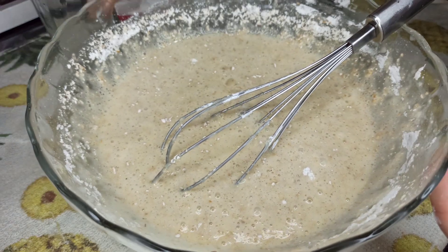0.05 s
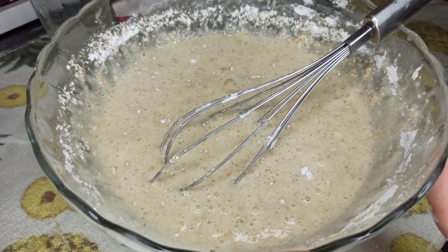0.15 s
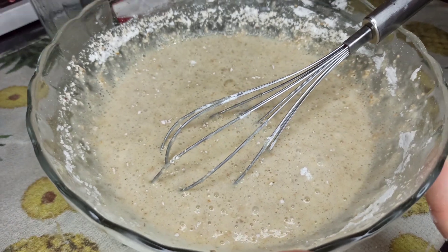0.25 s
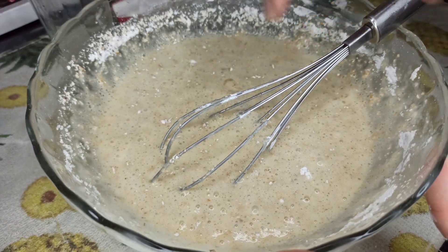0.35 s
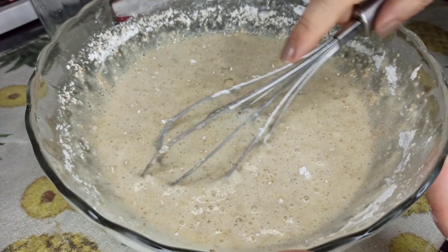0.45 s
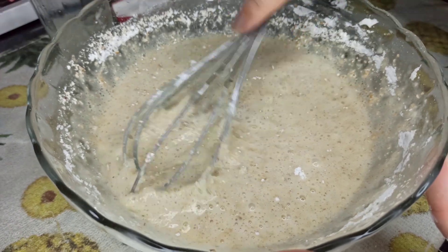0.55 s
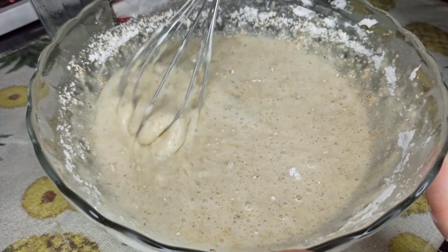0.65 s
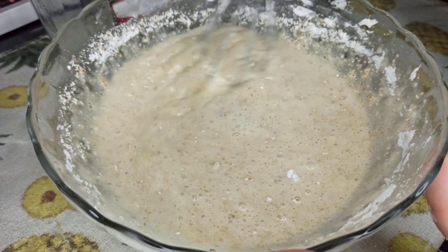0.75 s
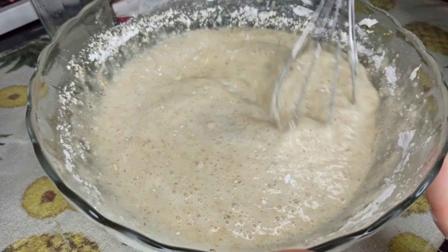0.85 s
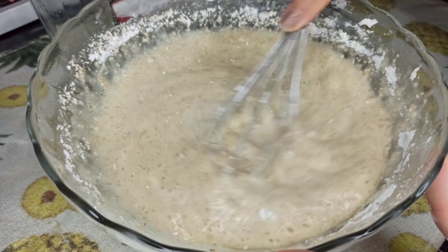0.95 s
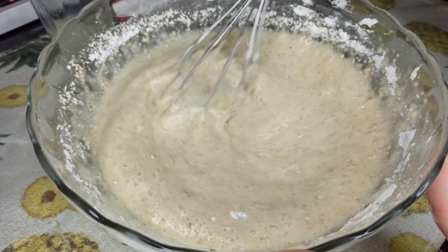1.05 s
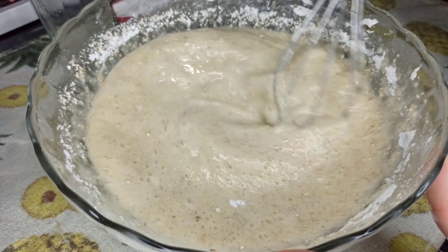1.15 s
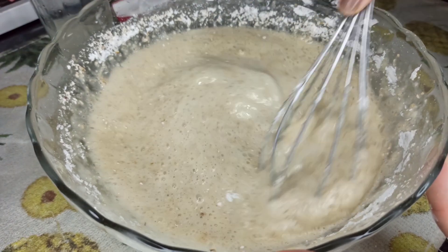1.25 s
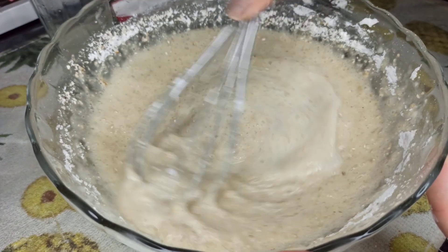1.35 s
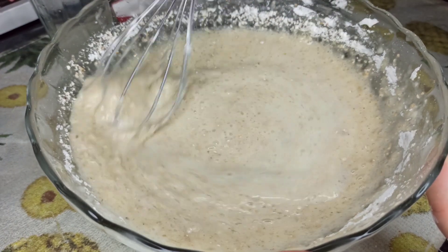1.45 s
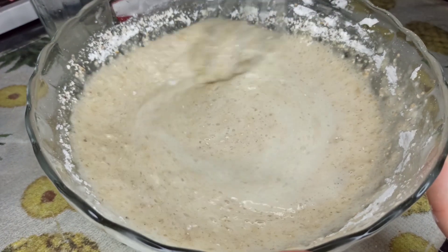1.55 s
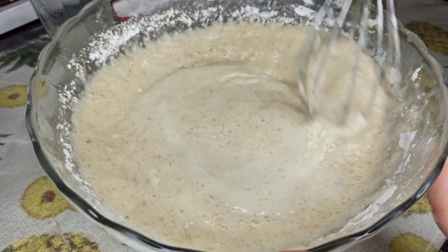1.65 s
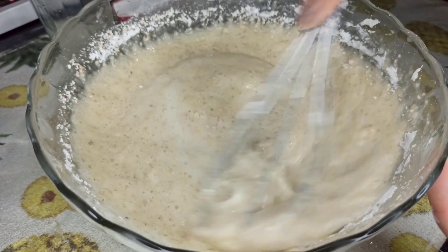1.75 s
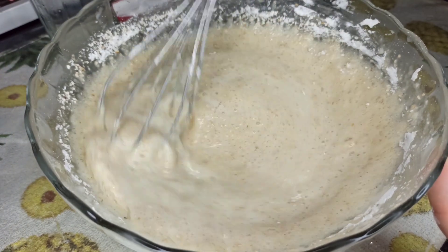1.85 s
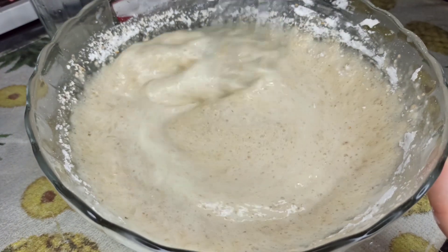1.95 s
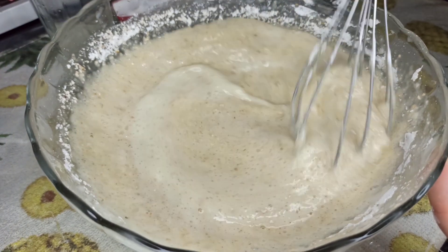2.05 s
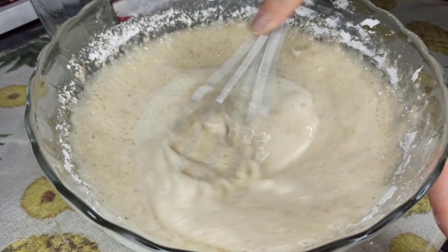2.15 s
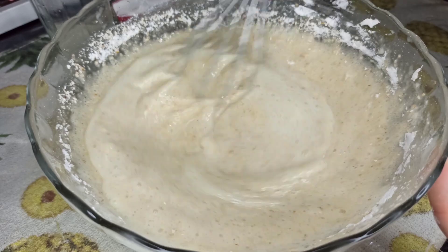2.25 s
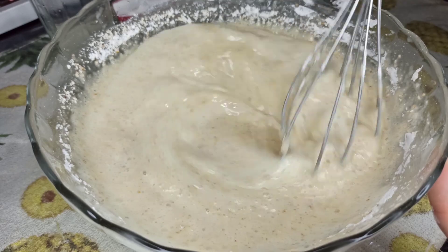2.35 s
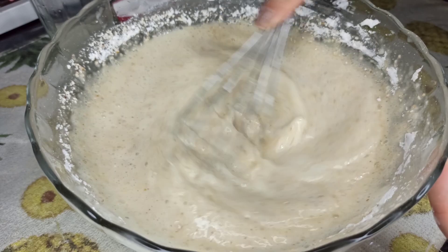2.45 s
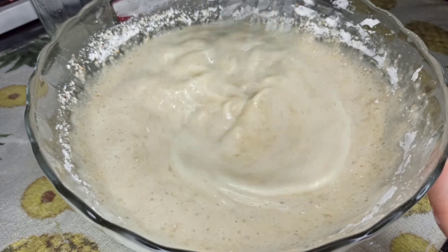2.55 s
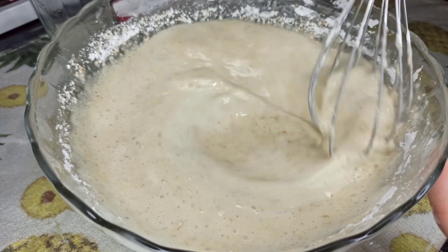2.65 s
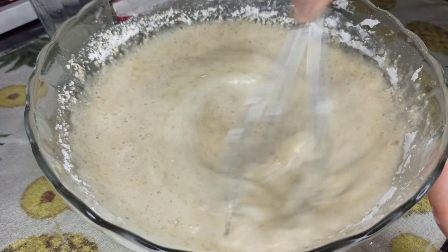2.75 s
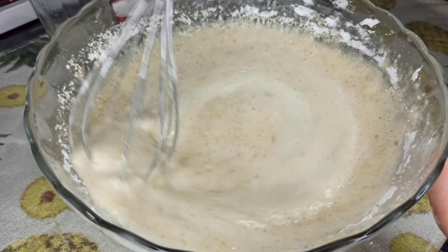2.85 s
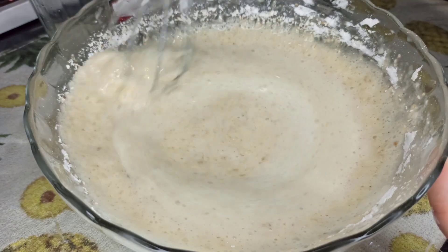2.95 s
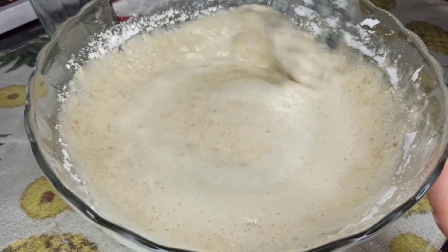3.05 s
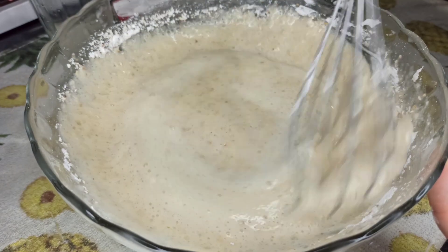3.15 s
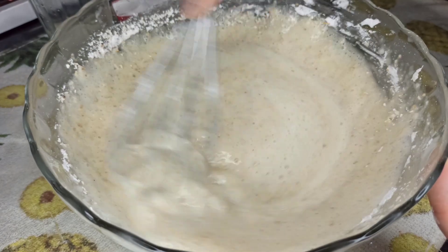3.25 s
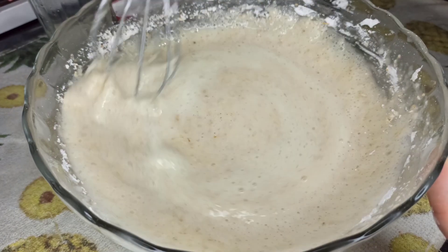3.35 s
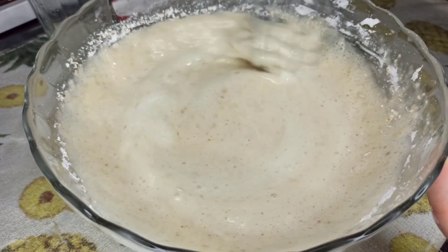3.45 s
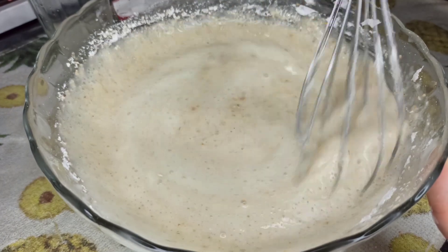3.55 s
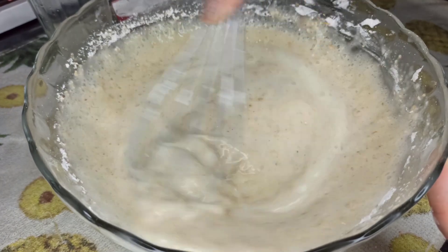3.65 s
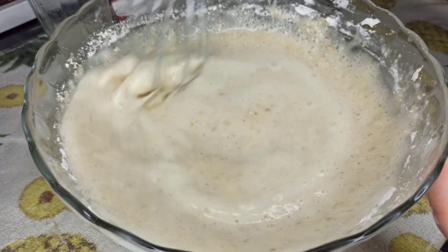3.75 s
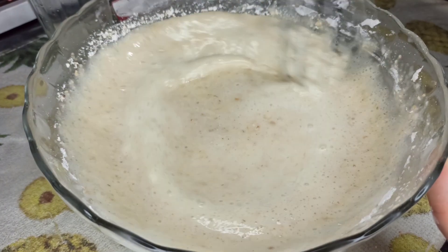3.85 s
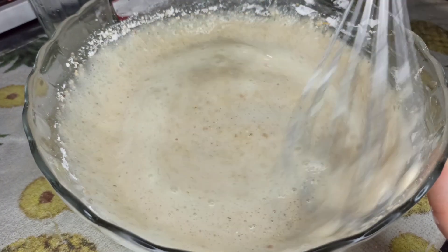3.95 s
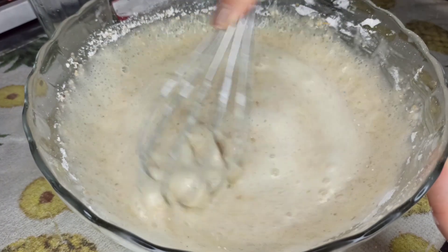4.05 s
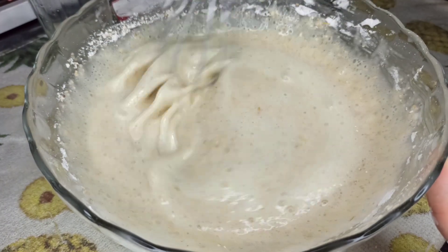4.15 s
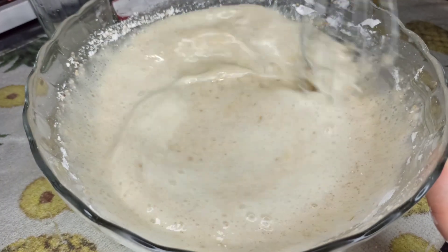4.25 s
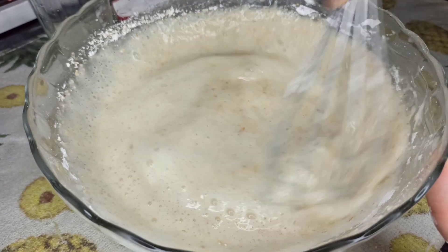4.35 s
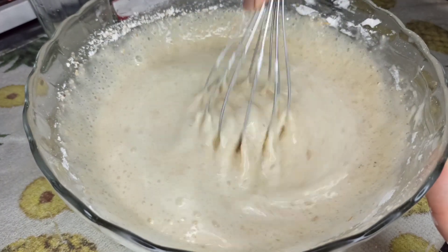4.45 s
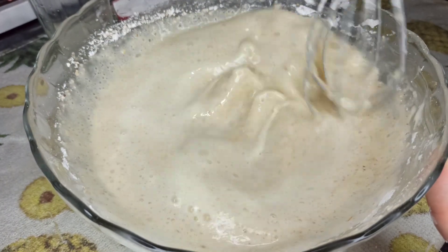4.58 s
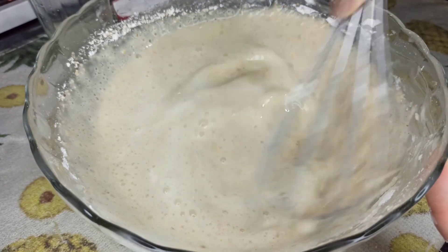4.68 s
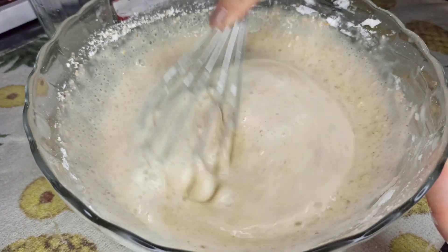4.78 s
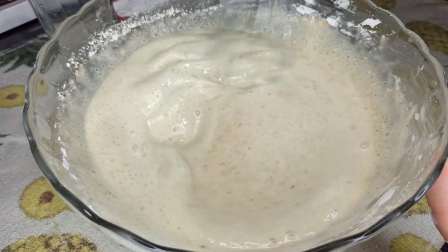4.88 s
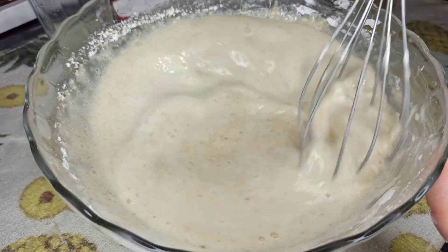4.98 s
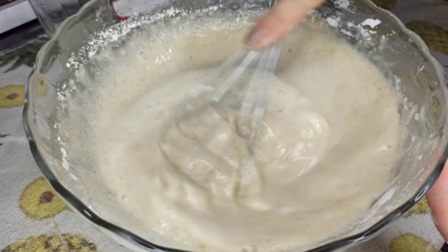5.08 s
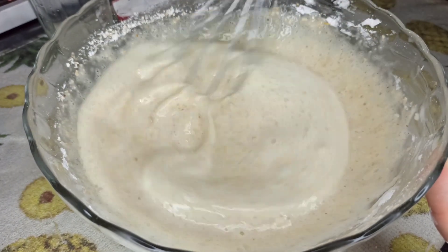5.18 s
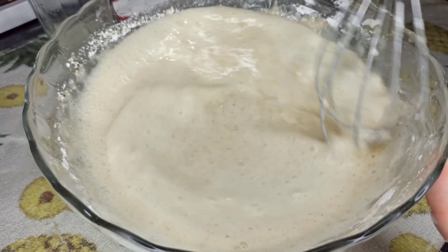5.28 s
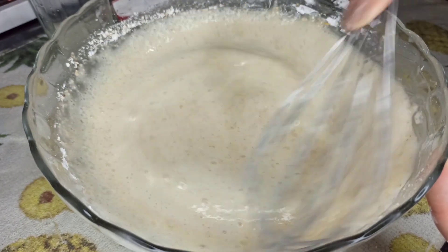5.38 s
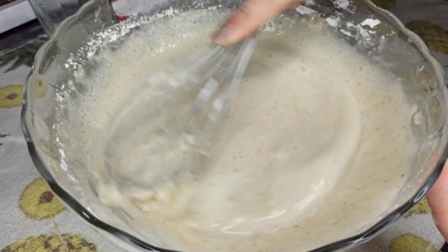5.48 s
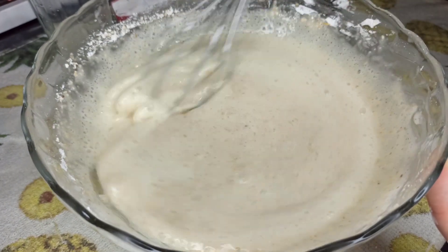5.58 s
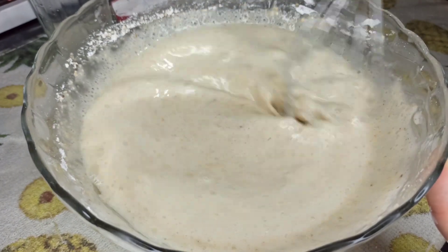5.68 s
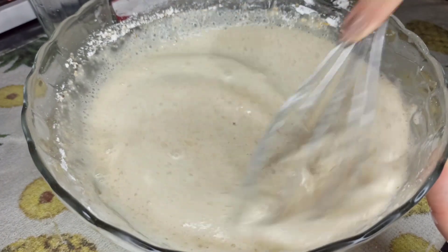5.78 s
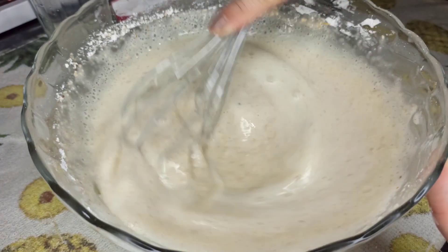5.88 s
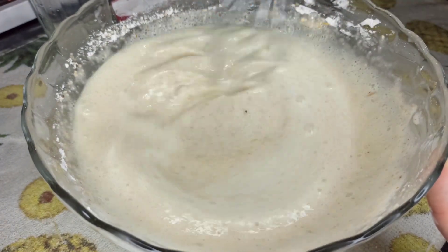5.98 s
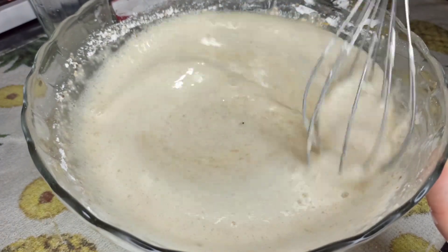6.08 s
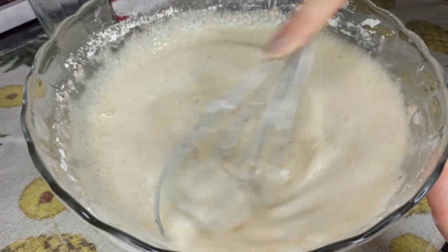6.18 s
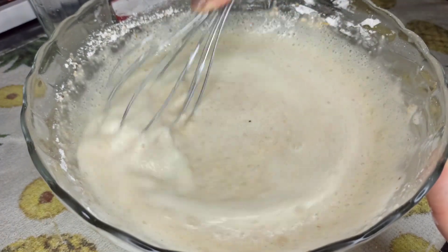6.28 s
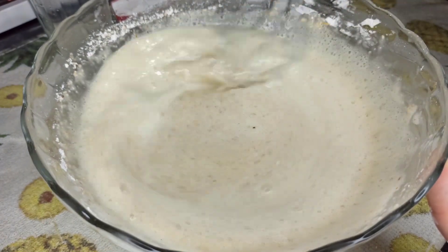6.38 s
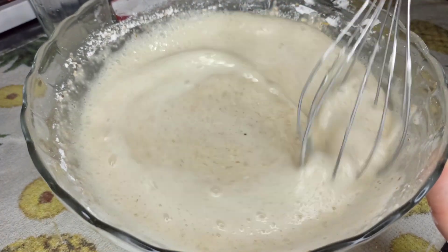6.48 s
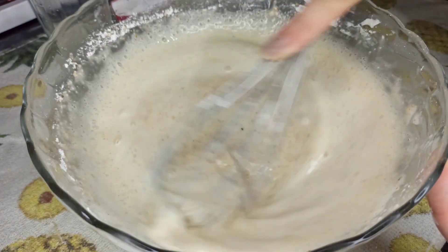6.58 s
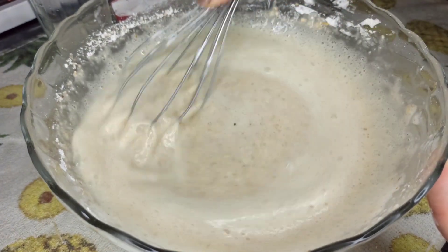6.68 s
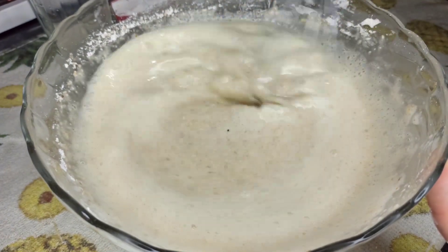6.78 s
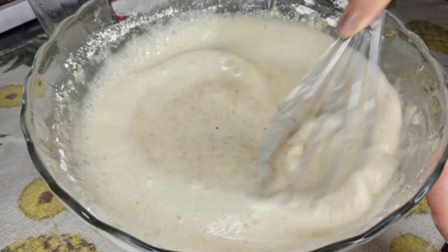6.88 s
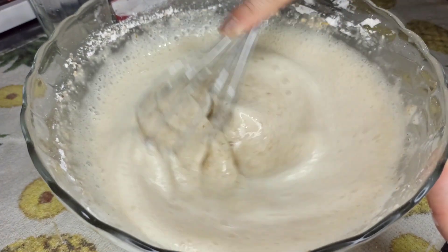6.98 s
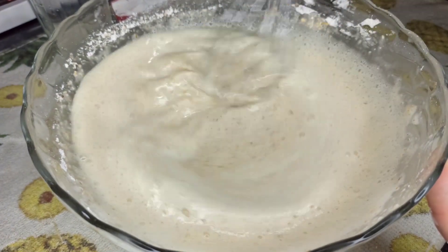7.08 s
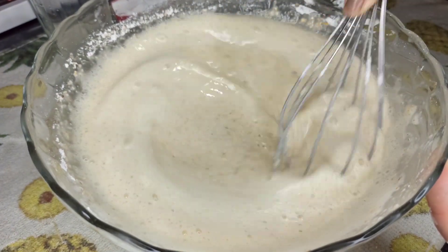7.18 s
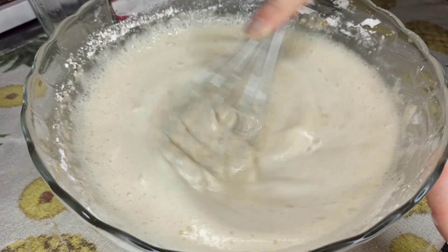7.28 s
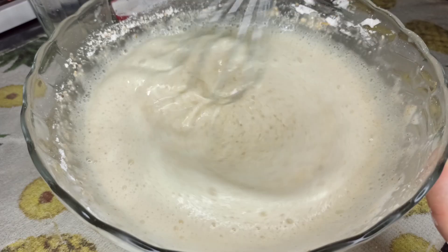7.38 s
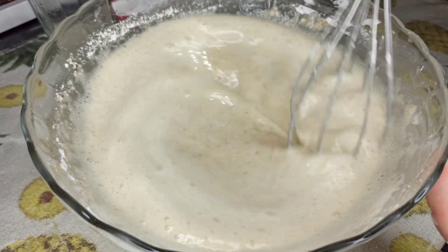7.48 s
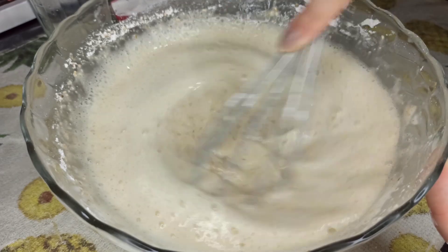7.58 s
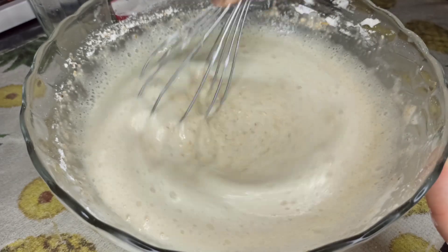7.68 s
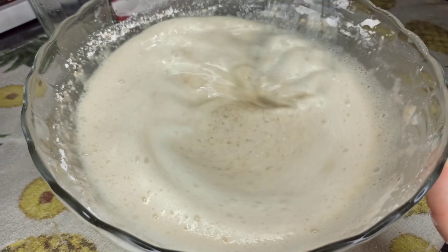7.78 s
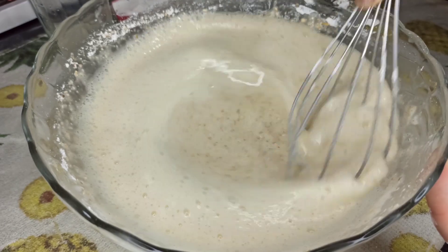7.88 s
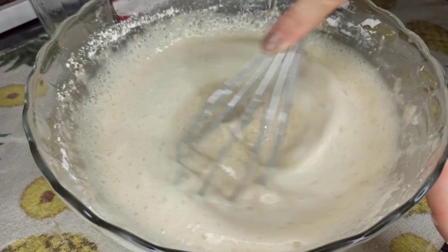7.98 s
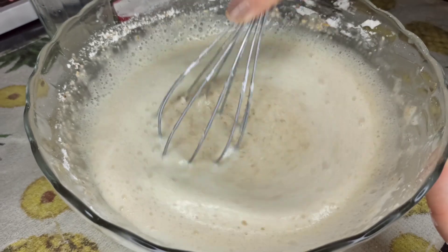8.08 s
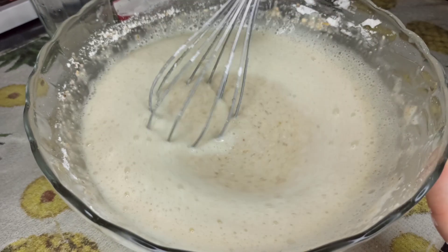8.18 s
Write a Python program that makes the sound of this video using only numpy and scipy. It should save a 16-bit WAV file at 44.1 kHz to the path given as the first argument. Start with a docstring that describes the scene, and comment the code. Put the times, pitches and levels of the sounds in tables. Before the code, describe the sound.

A quiet kitchen with soft, steady room noise and low hum, heard close in stereo. At about 0.05 s one strong, dull knock hits the table, its low boom dying quickly. There is little else until a faint glass touch near 0.45 s and the first light wire clicks at 0.65 s. From 1.3 s the whisk circles through thin batter: wet slaps, rising bubble plops and low table thuds, with a firmer blow at 2.2 s. From 2.3 s taps and gritty scrapes crowd together. Sharp wire cracks and short, choked glass clinks stand out at 3.7, 3.9, 4.26 and 4.5 s. The busiest stretch is 5.3 to 6.6 s, with bright clinks near 5.49 and 6.24 s and heavy low rocking. After 6.7 s the strokes are somewhat lighter and wetter, with scrapes around 7.3 s and a last cluster of taps near 7.8 to 7.95 s.

```python
"""At a kitchen table in a quiet room, a wire whisk circles through thin batter in a glass bowl.
A two-port microphone is close by. Room noise hums throughout, and a knock on the table comes early.
Wires tap and scrape the glass: shaped noise makes the contacts, fading tones make the glass ring.
Each push thuds and rocks through the table top: tones and narrow noise make its sound.
Bubbles pop in the batter as short tones that glide upward."""
import sys
import numpy as np
from scipy import signal
from scipy.fft import rfft, irfft, next_fast_len
from scipy.io import wavfile
from scipy.ndimage import uniform_filter1d

SR = 44100
rng = np.random.default_rng(int(sys.argv[2]) if len(sys.argv) > 2 else 0)


def wav_record(signal):
    """Record a signal, one row per channel, as 16-bit PCM in the file named by sys.argv[1]."""
    frames = np.transpose(np.atleast_2d(signal))
    bounded = np.clip(frames, -1, 1)
    # unit amplitude maps onto the largest positive 16-bit level
    quanta = np.round(bounded * 32767).astype(np.int16)
    wavfile.write(sys.argv[1], SR, quanta)


N = 363021  # length [samples]

# Levels in the tables are starting levels: the functions mix them, and record() colours the result.
# t60 is the time a sound takes to fall by 60 dB.

# Steady room noise, overall level set by AIR_DB: (frequency [Hz], relative level per Hz [dB])
AIR = [(18, -77), (30, -34), (51, -25), (128, 10.5), (380, 5), (536, -14), (595, -11), (1120, -21),
       (1860, -47), (4440, -10.5), (5340, -34.5), (7150, -43), (9560, -46), (15400, -9.5), (16700, -68)]
# Wavering room tones: (frequency [Hz], width [Hz], level [dB])
HUM = [(129.4, 6.8, -58), (365, 180, -63), (670, 340, -58)]
# The whisk's stroke: (time [s], wire scrape level [dB], bowl drumming level [dB])
STROKE = [(0.0, -69, -62), (0.37, -66.5, -64.5), (2.31, -58, -54.5), (2.82, -62.5, -57), (3.53, -57, -50),
          (4.84, -57.5, -57), (5.32, -56, -51.5), (5.52, -59.5, -56.5), (6.6, -59.5, -54.5),
          (7.75, -61.5, -56), (8.23, -66.5, -66)]
# Wires pressed harder along the glass: (start [s], length [s], gain added to the scrape [dB])
DRAGS = [(0.57, 0.023, -19), (2.432, 0.037, -4), (2.574, .04, -3), (3.163, 0.05, -7), (3.396, 0.062, -4),
         (4.108, 0.08, -5), (5.636, .05, -2), (6.063, 0.031, -3), (6.798, 0.047, -0.5), (7.313, 0.041, 3),
         (7.424, 0.053, -2)]
# Short, broad buzzes of the whisk wires: (frequency [Hz], width [Hz], relative level [dB])
WIRES = [(6320, 150, -6), (6960, 200, 0), (7600, 200, 2), (8400, 250, -11)]
# Pushes that rock the table: (peak time [s], level [dB], deepest sway against it [dB], climb [dB/s])
ROCK = [(.41, -59, 5, 149), (1.401, -39.5, -0.5, 147), (1.81, -39, 1, 236), (2.189, -35, -15, 298),
        (2.84, -38, 2.5, 152), (3.261, -36.5, -0.5, 125), (3.66, -37, -3, 114), (4.03, -36.5, 1, 146),
        (4.76, -37, -1.5, 95), (5.09, -46, -5, 119), (5.449, -28, -24, 266.5), (5.5, -32.5, -7, 300),
        (5.87, -35, -7, 157), (6.219, -27, -11, 306), (6.62, -30.5, -7, 256), (7.63, -50, -22, 85),
        (8.07, -51, -20, 66)]
# Rings of the glass bowl loaded with batter: (frequency [Hz], relative level [dB], base t60 [s])
GLASS = [(996, -8, .12), (1783, 0, .22), (2722, 0, .17), (3797, 0, .15), (3720, -6, .07), (4995, -5, .1),
         (6310, -8, .07), (6700, -12, .06), (6975, -6, .06), (7600, -5, .05), (7730, -11, .06)]
# How the first four GLASS rings reach the ports: (left minus right [dB], left lead [radians])
GLASS_PORTS = [(2.5, 0.4), (-5.5, -0.45), (-3, -1.4), (-2, 0.32)]
# Clear pings of the glass, until the batter or the next wire damps them:
# (time [s], levels of the first four GLASS rings [4 x dB], length before choking [s])
PINGS = [(0.447, -48, -63, -53, -57, 0.055), (1.5749, -63, -57, -68, -73, 0.035),
         (1.7791, -54, -47, -61, -55, 0.028), (2.742, -55, -72, -61, -55, 0.02),
         (3.0604, -50, -53, -65, -52, 0.035), (3.358, -61, -61, -52, -57, 0.048),
         (3.415, -46, -52, -55, -61, 0.051), (3.489, -58, -45.5, -55, -54, 0.037),
         (3.563, -55, -53, -64, -57, 0.038), (3.73, -60, -55, -50, -58, 0.025),
         (3.845, -52, -53, -55, -55, 0.03), (3.881, -45, -42, -46, -50, 0.016),
         (3.898, -58, -52, -53, -40, 0.016), (3.916, -55, -52, -48, -52, 0.03),
         (3.9648, -56, -38.5, -42, -44.5, 0.03), (4.008, -53, -56, -53, -60, 0.021),
         (4.2515, -54, -45, -54, -54, 0.009), (4.2614, -35, -36.5, -41, -48, 0.049),
         (4.6559, -63, -64, -53, -40, 0.014), (4.917, -60, -56, -58, -57, 0.043),
         (4.9583, -53, -51, -56, -39.5, 0.042), (5.2944, -42, -57, -57, -51, 0.035),
         (5.357, -61, -44, -71, -53, 0.02), (5.381, -55, -55, -42, -51, 0.018),
         (5.4229, -46, -49, -54, -46, 0.013), (5.44, -54, -40.5, -48, -42, 0.036),
         (5.488, -52, -36.5, -40, -50, 0.049), (6.153, -64, -53, -47.5, -69, 0.026),
         (6.203, -55, -47.5, -61, -53, 0.035), (6.2403, -55, -40, -55, -44.5, 0.046),
         (6.4539, -47, -47, -59, -45, 0.044), (6.526, -64, -53, -62, -56, 0.056),
         (6.5842, -55, -58, -66, -65, 0.039), (6.638, -49, -66, -66, -63, 0.016),
         (7.8416, -56, -57, -56, -37, 0.028), (7.888, -69, -60, -65, -56, 0.03)]
# Wires striking glass: (time [s], crack level [dB], then levels against it before mixing:
# low ring [dB], high ring [dB], dull clack [dB], wet smack [dB], fine tick [dB];
# plop frequency at its start [Hz], base t60 of the crack [s])
TAPS = [(0.4483, -48.5, 0, -14, -5.5, 1.5, -21, 746, 0.097),
        (0.649, -38, -35, -32, -42, -6, -24, 660, 0.02), (0.6777, -38.5, -21, -11, -12, -3, -25, 610, 0.03),
        (0.6936, -41, -23, -24, -5, -14, -24, 650, 0.032),
        (0.9777, -39, -37, -23, -9.5, -11, -14.5, 604, 0.026),
        (1.3148, -33, -38, -38, -13, -10.5, -27, 714, 0.03),
        (1.417, -40, -38, -25, -5, -1, -31, 737, 0.053), (1.5802, -47.5, 4, -46, -13, -10, -24, 774, 0.34),
        (1.7791, -32, -18, -41, -9.5, -11, -16, 678, 0.033),
        (2.0164, -45.5, -25, -29, 7.5, 2.5, -14, 1110, 0.019),
        (2.08, -43, -41, -34, -7, -7, -6.5, 674, 0.039), (2.1729, -29, -29, -19, -7, -0.5, -15, 630, 0.014),
        (2.218, -37.5, -31, -26, -3.5, -8, -15, 630, 0.069),
        (2.319, -39.5, -35, -29, -22, -14, -12, 680, 0.027),
        (2.3337, -34, -36, -39, -10.5, -6, -18, 803, 0.047),
        (2.478, -39, -35, -29, -9, -14, -28, 580, 0.061),
        (2.4974, -35.5, -46, -27, -3.5, -12.5, -36, 670, 0.061),
        (2.514, -33, -38, -36, -18, -5.5, -19, 760, 0.032),
        (2.547, -34, -32, -34, -7, -12, -21, 744, 0.014), (2.6058, -45, -25, -16, 2.5, -19, -30, 755, 0.02),
        (2.741, -36.5, -31, -20, -5.5, -3.5, -15, 1060, 0.048),
        (2.765, -38, -33, -28, -15, -11, -16, 1050, 0.034),
        (3.058, -41.5, -15, -18, -2, -2, -18, 797, 0.049),
        (3.0831, -38.5, -28, -24, -3, -9, -38, 703, 0.028), (3.094, -42, -32, -30, -4, -6, -16, 790, 0.015),
        (3.1535, -40.5, -29, -25, -14, -8, -27, 680, 0.043),
        (3.1753, -41, -26, -6, -1.5, -2.5, -21, 624, 0.018),
        (3.2943, -39, -34, -29, -9, -6, -15.5, 704, 0.064),
        (3.3328, -35.5, -39, -34, -13, -14.5, -20, 700, 0.03),
        (3.358, -44, -5, -14, -12, -14, -17, 721, 0.032), (3.4074, -45, -1, -28, -4.5, -12, -15, 747, 0.14),
        (3.458, -42.5, -27, -27, -5, -6, -24, 1460, 0.081), (3.485, -52, -10, -14, 3, 6, -20, 980, 0.031),
        (3.5542, -35.5, -21, -34, -7, -4.5, -19, 540, 0.026),
        (3.5996, -37, -22, -17, -11, -16, -27, 730, 0.093),
        (3.658, -33, -20, -35, -7.5, -5, -20, 752, 0.037),
        (3.725, -37, -37, -24, -18, -20, -26, 720, 0.032),
        (3.7327, -22, -28, -8, -12, -19, -22, 740, 0.023),
        (3.7787, -40, -20, -21, -17, -5.5, -26, 750, 0.039),
        (3.8808, -29, -15, -13.5, -2.5, -12, -25, 990, 0.013),
        (3.9152, -26.5, -29, -18, -9, -13, -19, 773, 0.024),
        (3.956, -35, -7, -14, -0.5, 1.5, -14, 720, 0.018),
        (3.9639, -40, -3, 0.5, -19, -4, -27, 1100, 0.029),
        (4.1597, -38.5, -12, -25, -3, 1.5, -10.5, 776, 0.026),
        (4.2496, -36, -16, -26, -4.5, -6, -15, 795, 0.068),
        (4.2611, -20, -23, -7, -10.5, -27, -16.5, 950, 0.034),
        (4.311, -41, -22, -25, 4, -1, -9, 1120, 0.031), (4.4072, -35, -28, -21, -5, -10, -16, 660, 0.099),
        (4.485, -32.5, -21, -34, -19, -17, -31, 840, 0.05),
        (4.505, -24, -33, -30, -5.5, -6, -16.5, 1360, 0.031),
        (4.6126, -50.5, -24, -6, 6, 1, -17, 780, 0.036), (4.6553, -39.5, -3, -7, -5, -8, -33, 595, 0.04),
        (4.7901, -40, -34, -22, -7, -2, -26, 600, 0.051),
        (4.9185, -44.5, -27, -26, -3.5, 0, -30, 760, 0.081),
        (4.959, -32.5, -32, -14, -5.5, -5.5, -17.5, 706, 0.065),
        (5.356, -32, -24, -22, -17, -7, -21, 620, 0.026), (5.381, -34, -28, -2.5, -24, 1, -15, 708, 0.027),
        (5.4218, -30, -19, -17, -10, -3.5, -23, 930, 0.014), (5.437, -33, -12, -10, 0, -9, -27, 950, 0.017),
        (5.4821, -32.5, -38, 1, -5.5, -9, -30, 1470, 0.04),
        (5.488, -23.5, -15, -31, -18, -48, -16, 1030, 0.064),
        (5.5385, -36.5, -5.5, -21, -9, -12, -21, 734, 0.06),
        (5.592, -34.5, -35, -37, -23, -21, -26, 576, 0.037),
        (5.6135, -46.5, -30, -30, -9, 3, -23, 1350, 0.023),
        (5.709, -38, -39, -13, -8, -27, -30, 700, 0.036),
        (5.7728, -32, -33, -36, -9.5, -5, -18, 565, 0.026),
        (5.794, -47.5, -26, -28, -13, 4, -20, 663, 0.025),
        (5.841, -38, -35, -15, -4.5, -15, -26, 894, 0.022),
        (5.865, -29.5, -44, -30, -7.5, -19, -16, 706, 0.058),
        (5.883, -41, -35, -35, 0, -15, -22, 696, 0.023),
        (5.9217, -27.5, -43, -41, -4.5, -10.5, -19, 674, 0.041),
        (6.012, -28, -19, -41, -12, -9, -23, 1480, 0.018),
        (6.0756, -38.5, -23, -25, -6.5, -7.5, -24, 780, 0.03),
        (6.1538, -52.5, -23, -28, 6.5, 12, -24, 600, 0.026),
        (6.1958, -39, -18, -29, -20, -6.5, -12, 770, 0.032),
        (6.2367, -25.5, -8, -40, -8, -14, -17, 675, 0.04),
        (6.2858, -28, -32, -38, -6, -10, -23, 720, 0.032),
        (6.4542, -25.5, -24, -17, -8.5, -8.5, -26, 893, 0.02),
        (6.522, -44.5, -30, -30, -5, 3, -18, 730, 0.03), (6.5859, -42.5, -5, -20, -3, -4, -23, 760, 0.035),
        (6.6362, -35.5, -33, -35, -6, -7, -29, 1026, 0.025),
        (6.7805, -48.5, -30, -30, -1, 6.5, -20, 630, 0.018),
        (6.8274, -35.5, -15, -18, -46, -5.5, -19, 874, 0.016),
        (7.032, -35.5, -39, -27, -6.5, -0.5, -25, 620, 0.025),
        (7.0473, -38.5, -42, -26, -11, -17, -15, 604, 0.05),
        (7.1248, -44, -9, -16, -5.5, -2.5, -16, 620, 0.063),
        (7.1865, -34.5, -41, -35, -9.5, -7.5, -16.5, 636, 0.029),
        (7.3738, -33.5, -33, -39, 2, 6.5, -7, 1410, 0.01),
        (7.4007, -35, -35, -34, -12, -5, -15, 730, 0.016),
        (7.4786, -35.5, -14, -26, -9, -11, -16, 734, 0.04),
        (7.65, -40.5, -28, -17, -8, -8, -26, 570, 0.029),
        (7.8068, -31.5, -39, -37, -8, -16, -38, 820, 0.027),
        (7.8414, -31.5, -37, -15, -6.5, -10, -26, 730, 0.031),
        (7.886, -38, -22, -18, -3, -2, -12, 594, 0.036), (7.9165, -50, -19, -31, -8, 7.5, -15, 696, 0.052),
        (7.9368, -36, -29, -16, -5, -2, -19, 670, 0.031)]
# Table top with the bowl on it: (frequency [Hz], relative level [dB], base t60 [s])
TABLE = [(72.3, -51, 0.17), (118, -13, 0.72), (173, -27, 0.1), (234, -37, 0.02), (290, -5.5, 0.3),
         (345, 10, 0.25), (399.5, -0.5, 0.71), (452.4, -4, 0.16), (574, 0, 0.27), (678, 8, 0.13),
         (950, -4.5, 0.28)]
# Blows into the table: (time [s], level [dB], gulp frequency at its start [Hz],
# t60 factor [times, at least 0.2], rise time [s])
THUDS = [(0.647, -41.5, 276, 1, 0.0032), (1.419, -28.5, 363, 0.18, 0.0049), (1.601, -40, 385, 0.72, 0.0051),
         (1.668, -39.5, 392, 0.57, 0.0045), (1.735, -37, 340, 0.22, 0.0031),
         (1.781, -31.5, 374, 0.5, 0.005), (1.868, -32, 318, 0.33, 0.0045),
         (2.174, -20.5, 304, 0.22, 0.0044), (2.328, -37.5, 390, 0.45, 0.004),
         (2.743, -32, 344, 0.38, 0.0047), (2.856, -36, 409, 0.29, 0.0034), (3.062, -30, 326, 0.45, 0.0052),
         (3.203, -39, 340, 0.32, 0.0031), (3.303, -34.5, 374, 0.31, 0.0051),
         (3.665, -29.5, 325, 0.18, 0.0055), (3.736, -31, 337, 0.18, 0.0036),
         (3.885, -37.5, 359, 0.65, 0.0045), (3.925, -37, 369, 0.36, 0.0043),
         (3.958, -30.5, 361.4, 0.44, 0.0044), (4.011, -32.5, 335.5, 0.61, 0.0058),
         (4.12, -26.5, 345, 0.19, 0.0049), (4.147, -38, 350, 0.22, 0.0024), (4.265, -28, 381, 0.49, 0.0075),
         (4.419, -30, 319, 0.4, 0.0035), (4.487, -37.5, 303, 0.71, 0.005), (4.787, -36, 345, 0.39, 0.0028),
         (4.931, -30.5, 331, 0.71, 0.0074), (5.096, -26, 316, 0.23, 0.0034),
         (5.281, -31.5, 390, 0.48, 0.0047), (5.396, -35, 329, 0.77, 0.0046),
         (5.427, -36, 372, 0.58, 0.0063), (5.541, -32.5, 320, 0.3, 0.0041),
         (5.83, -35.5, 353, 0.27, 0.0032), (5.867, -33, 326, 0.35, 0.0028),
         (5.92, -29.5, 302, 0.26, 0.0033), (6.156, -32.5, 378.5, 0.89, 0.00414),
         (6.23, -36, 350, 0.52, 0.0041), (6.288, -39, 342, 0.52, 0.0071), (6.454, -28.5, 351, 0.68, 0.0054),
         (6.487, -42, 358, 0.48, 0.0049), (6.525, -27.5, 347, 0.35, 0.0088),
         (6.578, -38.5, 381, 0.67, 0.0043), (6.64, -31, 334, 0.28, 0.0046), (6.839, -36.5, 376, 1, 0.0053),
         (6.897, -33.5, 404, 0.49, 0.0033), (6.955, -38, 299, 0.24, 0.0016),
         (7.018, -40.5, 384, 0.48, 0.004), (7.144, -26.5, 350, 0.21, 0.0038),
         (7.18, -36, 365, 0.33, 0.0034), (7.398, -42, 328, 0.55, 0.0044), (7.488, -35.5, 350, 0.68, 0.004),
         (7.597, -34, 325, 0.21, 0.0031), (7.847, -35, 381, 0.73, 0.0049)]
# Likeness of noise at the two ports: (frequency [Hz], left-right likeness [-1 to 1])
LIKENESS = [(60, 1), (180, 0.95), (550, 0.84), (1650, 0.14), (4970, 0.097), (15000, -0.026)]
# Microphone colour: (frequency [Hz], gain [dB])
MIC = [(30, -12), (45, -4.5), (70, 0.5), (2000, -10), (4600, -5.5), (5000, -14.5), (5900, -10.5),
       (6900, -0.5), (8300, -5), (9000, -24.5), (9500, -31), (11200, -51.5), (11700, -15), (13500, -12.5),
       (15700, -13.5), (16100, -48)]
# Phase difference between the ports: (frequency [Hz], left lead [radians])
PORT_LEAD = [(60, 0.11), (300, 0.095), (600, 0.94), (1500, 1.1), (4000, 0.91)]
# Level difference between the ports: (frequency [Hz], left minus right [dB])
PORT_DB = [(60, 1), (180, 1), (550, -1), (1650, 1.5), (4970, 1.5), (15000, 1)]

AIR_DB = -48
SING_DB = -23  # faint singing of the rubbed glass, against the scrape
DRAG_RISE, DRAG_FALL = 2700, 1240  # dB/s
TICKS_PER_S, TICKS_DB = 87, -4.5  # average rate; level against the scrape control
ROCK_FALL, ROCK_REST_DB, SWAY_REST_DB = 240, -57.5, -64.5  # fall [dB/s]; levels between pushes [dB]
BUBBLES_PER_S, BUBBLES_DB = 120, -6  # average rate; level against the drumming control
KNOCK_S, KNOCK_DB = .0492, -1
PING_DAMP_S = 0.0061  # time constant of the choke
MID_RING_DB = 1.5  # the middle ring, against the mean of the low and high dB
TAP_MAIN_DB = -8  # a plain tap stirs the long rings only weakly
THUD_DEEP_DB = 7  # extra strength of the table tones below 200 Hz
THUD_LEAD = 0.78  # a blow starts this many rise times before its listed time
EDGE_HZ = 16700  # upper edge of the final band


def gain_of(db):
    """Turns dB into a multiplier of the sound pressure."""
    return 10 ** (np.asarray(db) / 20)


def evened(x):
    """Scales a signal to an rms of 1."""
    return x / np.sqrt(np.mean(x ** 2) + 1e-20)


def read(points, hz):
    """Reads a curve between its points along a logarithmic frequency scale."""
    f, value = np.transpose(points)
    return np.interp(np.log(hz + 1), np.log(f + 1), value)


def add(mix, s, sound):
    """Adds a sound to the mix from time s [s], cut at the end if needed."""
    part = mix[:, round(s * SR):][:, :sound.shape[1]]
    part += sound[:, :part.shape[1]]


def stroke(column):
    """Gives one level of the whisk's stroke [dB] for every sample."""
    rows = np.array(STROKE)
    return np.interp(np.arange(N) / SR, rows[:, 0], rows[:, column])


def band(x, lo_hz, hi_hz):
    """Keeps mainly the frequencies between two edges."""
    edges = [lo_hz, min(hi_hz, .49 * SR)]
    return signal.sosfilt(signal.butter(2, edges, "band", fs=SR, output="sos"), x)


def pair(size):
    """Makes noise for two ports, alike in the bass and nearly unrelated in the treble."""
    a, b = rfft(rng.standard_normal((size, 2)).T)
    same = np.clip(read(LIKENESS, np.fft.rfftfreq(size, 1 / SR)), -1, 1)
    return irfft(np.array([a, same * a + np.sqrt(1 - same ** 2) * b]), size)


def resonate(x, hz, width):
    """Lets one frequency build up with a peak gain of 1, as a springy object does."""
    turn = np.exp(2j * np.pi * np.cumsum(hz * np.ones(N)) / SR)
    r = np.exp(-np.pi * width / SR)
    # Shift hz down to zero, smooth, then shift it back up.
    return 2 * (turn * signal.lfilter([1 - r], [1, -r], x / turn)).real


def grain_sizes(per_s, spread_db, limit):
    """Scatters grains of uneven size at random, with silence between them."""
    strength = gain_of(spread_db * np.minimum(rng.exponential(1, N), limit))
    return strength * (rng.random(N) < per_s / SR)


def grit(per_s, spread_db, ms):
    """Makes a lumpy envelope of rms 1 from grains that die with a time constant in ms."""
    size = grain_sizes(per_s, spread_db, 4)
    return evened(signal.lfilter([1], [1, -np.exp(-1000 / (ms * SR))], size))


def ring(modes, db, slow, phase, size):
    """Strikes several fading tones at once, with extra dB and a phase per port for each."""
    hz, mode_db, t60 = np.transpose(modes)[:, :, None]
    t = np.arange(size) / SR
    strength = gain_of(mode_db + db[..., None] - 60 * t / (t60 * slow))
    tones = np.sin(2 * np.pi * hz * t + phase[:, :, None])
    return (strength * tones).sum(1)


def radiated(luck, spread):
    """Gives each glass ring its own dB and phase per port, with the phase blurred by chance."""
    db, lead = np.zeros((2, luck.shape[1]))
    db[:len(GLASS_PORTS)], lead[:len(GLASS_PORTS)] = np.transpose(GLASS_PORTS)
    side = np.array([[.5], [-.5]])
    return side * db, 2 * luck[0] + side * (lead + spread * luck[1])


def plop(hz, rise, t60, lag, t):
    """Sounds a pocket of air in the batter: a short tone that glides up as the pocket closes."""
    phase = 2 * np.pi * hz * (t + rise * t ** 2)
    return gain_of(-60 * t / t60) * np.sin(phase + np.array([[lag], [-lag]]))


def patchy(x, depth_db, frames, bins):
    """Varies the level in random patches of time and frequency, so contacts differ in colour."""
    z = signal.stft(x, nperseg=256, noverlap=192)[2]
    patches = rng.standard_normal(z.shape[1:])
    patches = uniform_filter1d(patches, round(bins), 0)
    patches = evened(uniform_filter1d(patches, round(frames), 1))
    return signal.istft(z * gain_of(depth_db * patches), nperseg=256, noverlap=192)[1][:, :N]


def wired(x, db):
    """Adds the buzz of the whisk wires to a contact noise."""
    buzz = sum(gain_of(g) * resonate(x, hz, width) for hz, width, g in WIRES)
    return x + gain_of(db) * buzz


def swells(start, length, db, rise, fall, rest_db):
    """Makes a gain that climbs to each event, holds for its length and sinks back to rest."""
    t = np.arange(0, N, 32)[:, None] / SR  # every 32nd sample is enough for a slow gain
    early = np.maximum(start - t, 0)
    late = np.maximum(t - start - length, 0)
    level = gain_of(rest_db) + gain_of(db - rise * early - fall * late).sum(1)
    return np.interp(np.arange(N) / SR, t[:, 0], level)


def steadied(x, ms):
    """Evens out the slow level changes of a narrow noise, leaving mainly its wavering pitch."""
    power = uniform_filter1d((x ** 2).mean(0), round(ms * SR / 1000))
    return evened(x / np.sqrt(power + 2.8 * np.mean(x ** 2)))


def room():
    """Makes steady room noise and a few fuzzy hum tones from filtered noise."""
    hz, noise = np.fft.rfftfreq(N, 1 / SR), pair(N)
    # Take the microphone colour out here, because record() puts it in.
    wash = irfft(rfft(noise) * gain_of(read(AIR, hz) - read(MIC, hz)), N)
    hum = sum(gain_of(db) * evened(resonate(noise, f, width)) for f, width, db in HUM)
    return gain_of(AIR_DB) * evened(wash) + hum


def scrape():
    """Drags wires over glass in many gritty slips; the rub keeps the glass faintly singing."""
    rub = patchy(pair(N) * (2.8 + grit(320, 7.8, 2.3)), 1.86, 12, 6)
    hiss = gain_of(14.5) * evened(wired(band(rub, 350, 16300), -13.0))
    drive = pair(N) * (.4 + grit(45, 3, 3.1))
    song = 0
    for (hz, *_), db, width in zip(GLASS[1:4], (-1.5, -8, -6), (22, 28, 30)):
        song = song + gain_of(db) * evened(resonate(drive, hz, width))
    start, length, db = np.transpose(DRAGS)
    hiss = hiss * swells(start, length, db, DRAG_RISE, DRAG_FALL, -2.35)
    return gain_of(stroke(1)) * (hiss + gain_of(SING_DB) * song)


def ticks():
    """Scatters tiny wire ticks and wet snaps, each a few cycles at one of twenty pitches."""
    out, t = np.zeros((2, N)), np.arange(600) / SR
    pitches = np.geomspace(900, 4600, num=20)
    size = grain_sizes(TICKS_PER_S, 2.4, 3)
    kind, lag = rng.integers(0, len(pitches), N), rng.standard_normal(len(pitches))
    for k, hz in enumerate(pitches):
        tone = plop(hz, 9.5, 10.0 / hz, lag[k], t) * (1 - np.exp(-t / 0.0005))
        out += signal.oaconvolve((size * (kind == k))[None], tone, axes=1)[:, :N]
    return gain_of(TICKS_DB + stroke(1)) * evened(out)


def push():
    """Turns the whisk's uneven push into bowl drumming, batter swishing and table rocking."""
    drive = pair(N)
    drive = drive * (1 + .5 * grit(20, 2, 20))
    drum = 0
    for hz, db in [(332, 5.0), (365, 3), (405, -4.0), (520, -4.0), (715, -1)]:
        drum = drum + gain_of(db) * resonate(resonate(drive, hz, 44), hz, 44)
    slaps = .3 + grit(120, 5, 6)
    swish = patchy(band(pair(N) * slaps, 540, 1800), 4.0, 5, 2.5)
    batter = gain_of(7.0) * evened(drum) + gain_of(3.0) * evened(swish)

    shake = pair(N)
    rock = resonate(resonate(shake, 104.0, 40), 123.7, 22)
    sway = resonate(resonate(shake, 84.0, 40), 84.0, 40)
    peak, db, deep, climb = np.transpose(ROCK)
    rock_gain = swells(peak, 0, db, climb, ROCK_FALL, ROCK_REST_DB)
    sway_gain = swells(peak, 0, db + deep, climb, ROCK_FALL, SWAY_REST_DB)
    table = rock_gain * steadied(rock, 72) + sway_gain * steadied(sway, 51)
    return batter * gain_of(stroke(2)) + band(table, 42, 157)


def bubbles():
    """Pops small air pockets at random in the batter, each size with its own rising tone."""
    out, t = np.zeros((2, N)), np.arange(3000) / SR
    pitches = np.geomspace(420, 1500, num=16)  # starting pitch of each bubble size [Hz]
    size = grain_sizes(BUBBLES_PER_S, 5.8, 4)
    kind, lag = rng.integers(0, len(pitches), N), rng.standard_normal(len(pitches))
    for k, hz in enumerate(pitches):
        tone = plop(hz, 3.1, 50.0 / hz, 2.45 * lag[k], t)
        tone = tone * (1 - np.exp(-t / .0015)) * (420 / hz) ** 0.24
        out += signal.oaconvolve((size * (kind == k))[None], tone, axes=1)[:, :N]
    return gain_of(BUBBLES_DB + stroke(2)) * evened(out)


def knock():
    """Hits the table once: air is pulled then pushed, the table rings and a dull rumble dies."""
    out, t = np.zeros((2, N)), np.arange(30000) / SR
    u = (t - .0014) / 0.0006
    front = band(1.63 * (u + 0.38) * np.exp(-u ** 2 / 2), 98, 5000)
    table = ring(TABLE, np.full(len(TABLE), -13.), 0.28, np.zeros((2, len(TABLE))), 30000)
    table = np.roll(table * (1 - np.exp(-t / 0.023)), 110, axis=1)  # 110 samples later
    # The boom and the shudder each have a quick fall and a slow, weak tail.
    boom = evened(band(band(pair(30000), 80, 1640), 124, 404)) * (1 - np.exp(-t / 0.0042))
    boom *= gain_of(-6.5 - 60 * t / 0.1) + gain_of(-34.5 - 60 * t / 1.0)
    shudder = evened(band(pair(30000), 130, 185))
    shudder *= gain_of(-16 - 60 * t / 0.084) + gain_of(-30 - 60 * t / 0.7)
    spray = gain_of(-32.5 - 60 * t / 0.12) * pair(30000)
    add(out, KNOCK_S, gain_of(KNOCK_DB) * (front + table + boom + shudder + spray))
    return out


def pings():
    """Strikes the first four glass rings afresh and chokes them after a moment."""
    out, t = np.zeros((2, N)), np.arange(6000) / SR
    rings = [(hz, 0, t60) for hz, _, t60 in GLASS[:4]]
    luck = rng.standard_normal((len(PINGS), 2, 4))
    for (s, *db, length), chance in zip(PINGS, luck):
        choke = np.exp(-np.maximum(t - length, 0) / PING_DAMP_S) * (1 - np.exp(-t / 0.0024))
        port_db, phase = radiated(chance, 0.24)
        add(out, s, ring(rings, db + port_db + 9.5, 1.0, phase, 6000) * choke)
    return patchy(out, 2.5, 5, 2.2)  # batter slides over the glass, so each ring wavers


def taps():
    """Strikes glass with wires: a noisy crack in four colours, a wet plop and an uneven ring."""
    crack, clack, smack, tick, glass, wet = np.zeros((6, 2, N))
    t = np.arange(6000) / SR
    luck = rng.standard_normal((len(TAPS), 3, len(GLASS)))
    for (s, db, low, high, dull, soft, fine, hz, t60), (uneven, *phase) in zip(TAPS, luck):
        # A sharp front, then a longer spray from the room and the batter.
        fall = gain_of(-1.0 - 60 * t / 0.0034) + gain_of(-60 * t / max(t60, .008))
        fall = (fall + gain_of(-12 - 60 * t / 0.18)) * (1 - np.exp(-t / 0.00072))
        burst = pair(6000) * fall
        burst[:, 30] += 2.5  # the solid click of first contact
        burst *= gain_of(db)
        add(crack, s, burst)
        add(clack, s, burst * gain_of(dull))
        add(smack, s, burst * gain_of(soft))
        pop = plop(hz, 0.41, 2.0 * t60, phase[0][0], t) * (1 - np.exp(-t / 0.000079))
        add(wet, s, gain_of(db + soft) * pop)
        add(tick, s, burst * gain_of(fine - 1.0 - 60 * t / 0.18))

        middle = (low + high) / 2 + MID_RING_DB
        struck = np.array([low, low, middle] + [high] * (len(GLASS) - 3)) + 2 * uneven
        struck[1:7] += TAP_MAIN_DB
        port_db, turn = radiated(np.array(phase), 1.0)
        tone = ring(GLASS, db + struck + port_db, 0.96, turn, 6000)
        add(glass, s, tone * (1 - np.exp(-t / 0.0032)))
    # Moving batter damps the glass unevenly, so the ring flutters.
    wander = uniform_filter1d(uniform_filter1d(rng.standard_normal((2, N)), 300), 300)
    flutter = 1 + 0.27 * evened(wander)
    noise = gain_of(5.0) * wired(band(crack, 2830, 12400), 0.0)
    noise = noise + gain_of(14.5) * band(clack, 1086, 4820)
    noise = noise + gain_of(17.0) * band(smack, 336, 1765)
    noise = noise + gain_of(25.5) * band(tick, 7430, 27000)
    return patchy(noise, 4.2, 8, 5) + gain_of(10.0) * wet + gain_of(10.0) * glass * flutter


def thuds():
    """Rings the table top with each blow, nearly alike at both ports, under a gulp of batter."""
    out, t = np.zeros((2, N)), np.arange(12000) / SR
    deep = np.array(TABLE)[:, 0] < 200
    luck = rng.standard_normal((len(THUDS), 2, len(TABLE)))
    for (s, db, hz, slow, rise), (uneven, lag) in zip(THUDS, luck):
        slow = max(slow, .2)
        struck = db + deep * THUD_DEEP_DB + 2 * uneven
        phase = np.array([0.19 * lag, -.2 * lag])
        sound = gain_of(-8.5) * ring(TABLE, struck, slow, phase, 12000)
        sound += gain_of(db + 5.5) * plop(hz, 0.7, 0.33 * slow, 0.04 * lag[0], t)
        onset = 1 - np.exp(-(t / max(rise, .0005)) ** 2)
        add(out, s - THUD_LEAD * rise, sound * onset)
    return out


def scene():
    """Adds all the sounds together at the two ports."""
    steady = room() + scrape() + ticks() + push() + bubbles()
    return steady + knock() + pings() + taps() + thuds()


def record(dry):
    """Sets the ports apart in level and phase, then adds microphone colour and a band limit."""
    size = next_fast_len(N)
    hz = np.fft.rfftfreq(size, 1 / SR)
    # Each port takes half of the level and phase difference.
    left = gain_of(read(PORT_DB, hz) / 2) * np.exp(.5j * read(PORT_LEAD, hz))
    ported = irfft(rfft(dry, size) * np.array([left, 1 / left]), size)[:, :N]
    mic_gain = gain_of(read(MIC, np.linspace(0, SR / 2, 1025)))
    colour = signal.firwin2(2047, np.linspace(0, 1, 1025), mic_gain)
    coloured = signal.oaconvolve(ported, colour[None], "same")
    edge = signal.firwin(511, EDGE_HZ, window=("kaiser", 9), fs=SR)
    return signal.oaconvolve(coloured, edge[None], "same")


dry = scene()
out = record(dry)
wav_record(out)
```